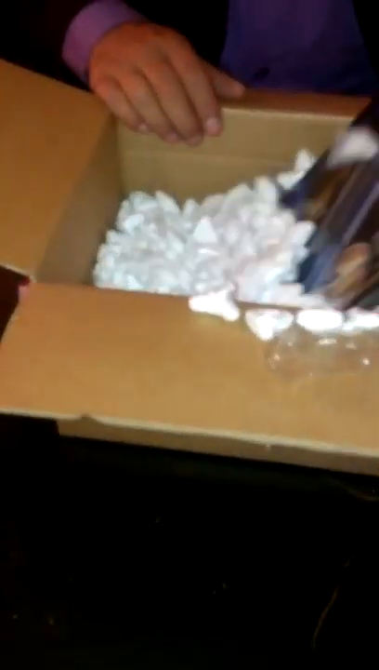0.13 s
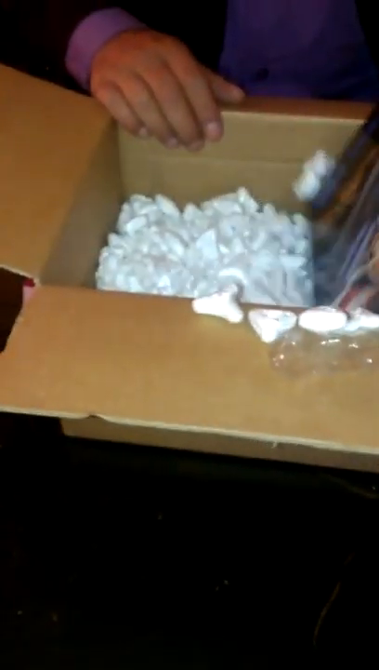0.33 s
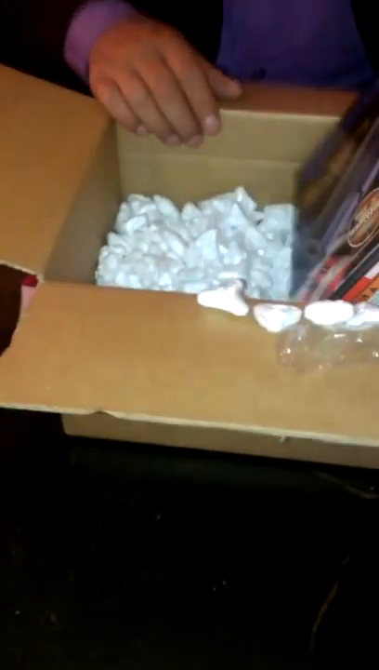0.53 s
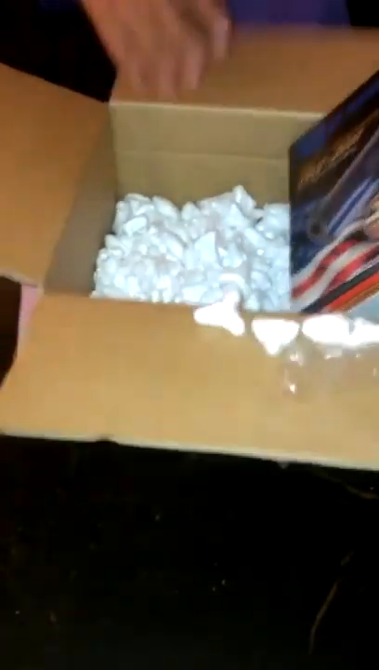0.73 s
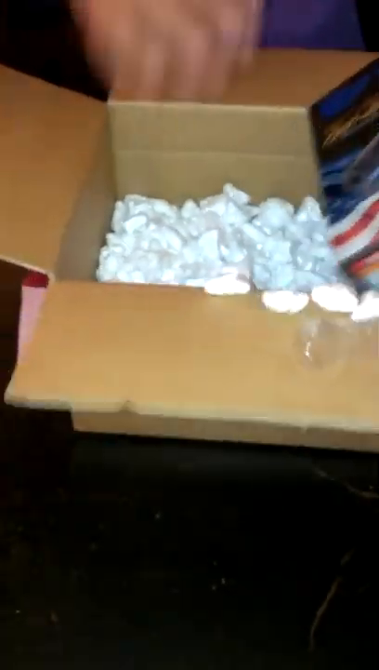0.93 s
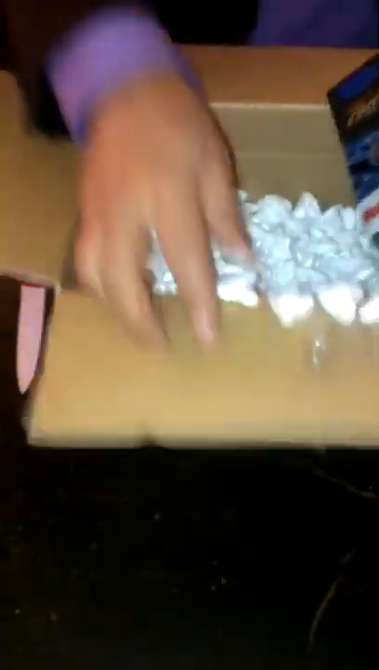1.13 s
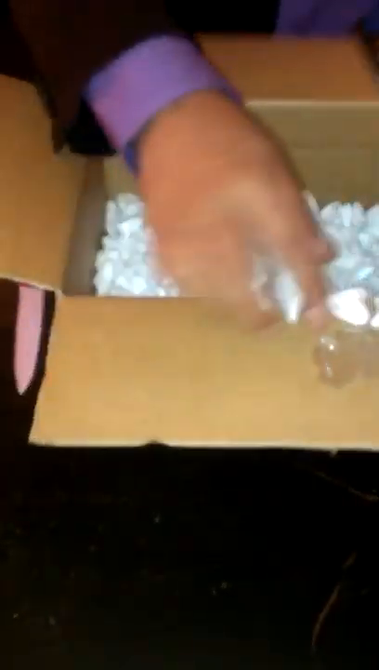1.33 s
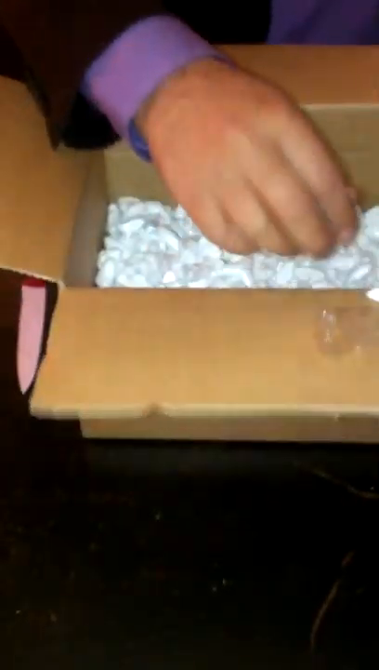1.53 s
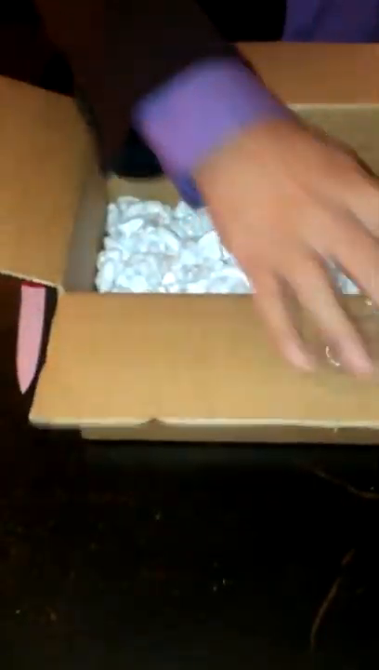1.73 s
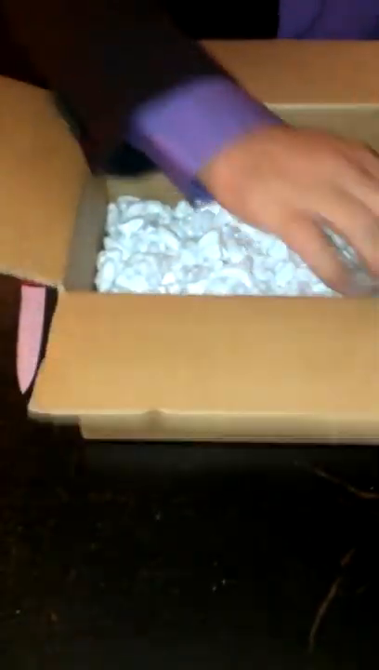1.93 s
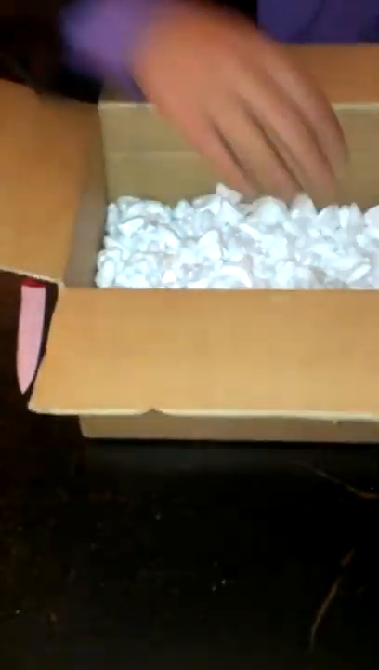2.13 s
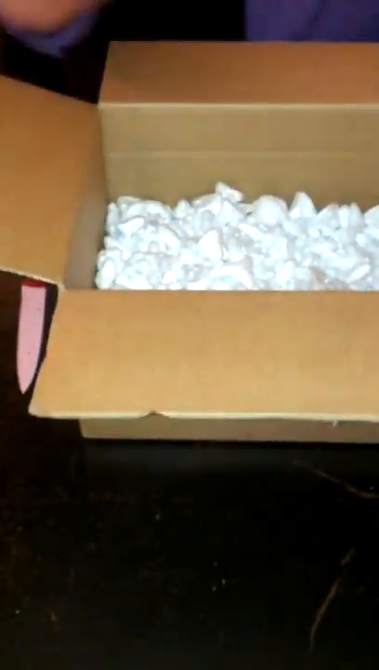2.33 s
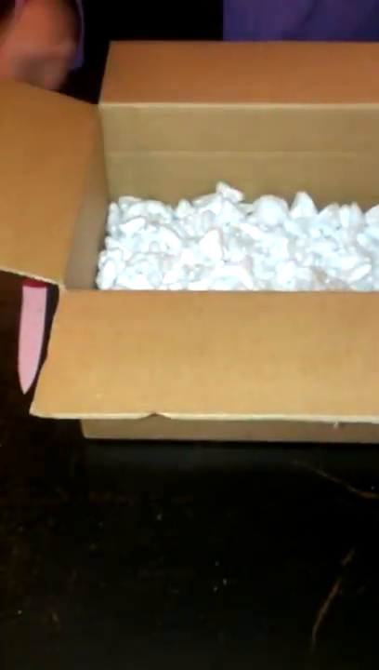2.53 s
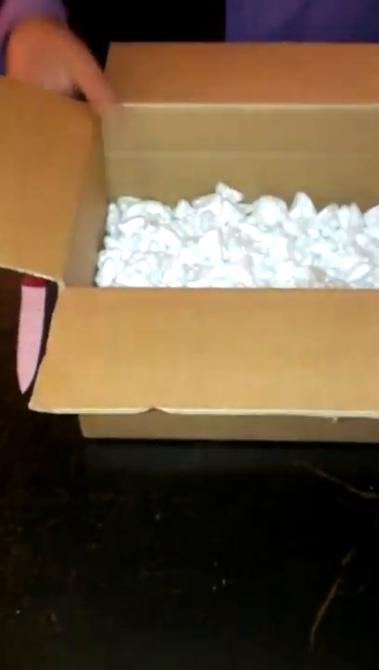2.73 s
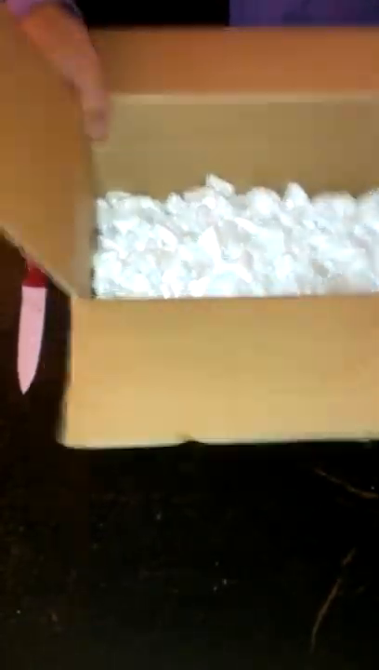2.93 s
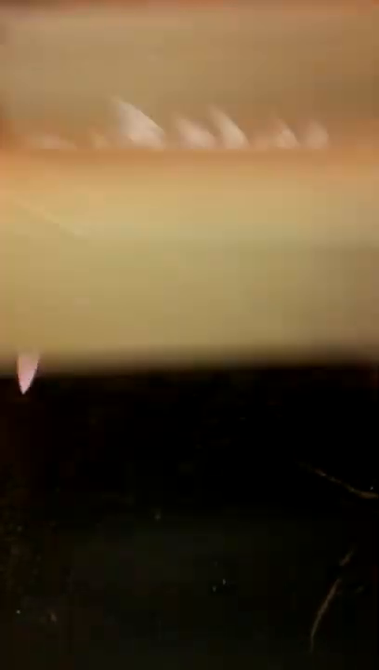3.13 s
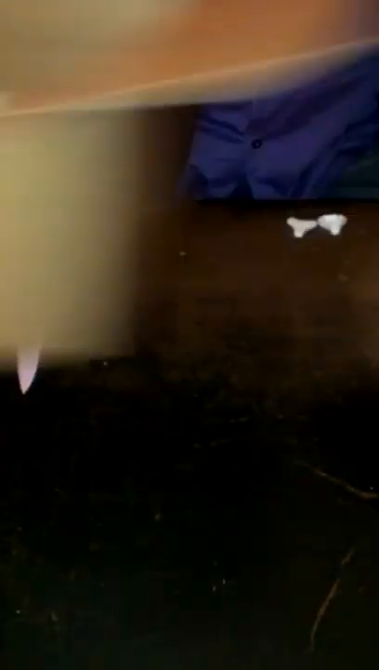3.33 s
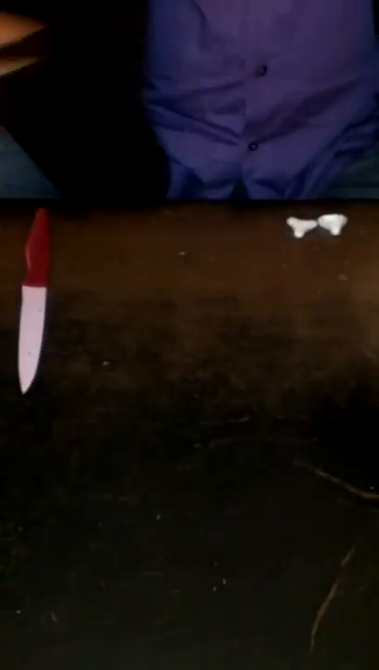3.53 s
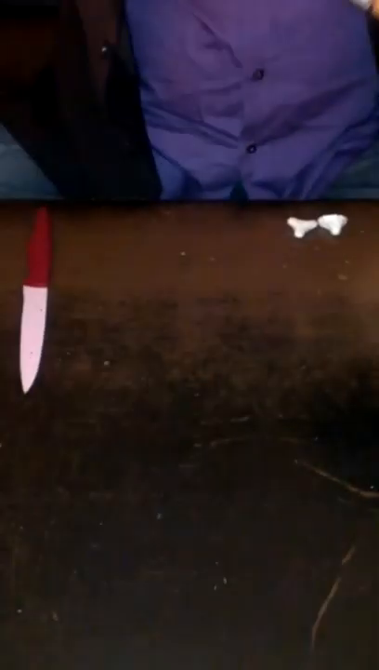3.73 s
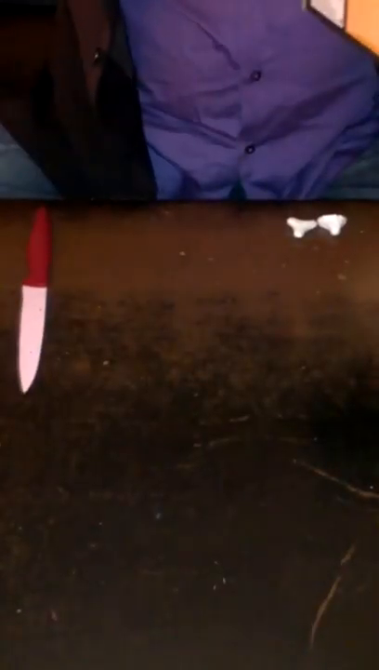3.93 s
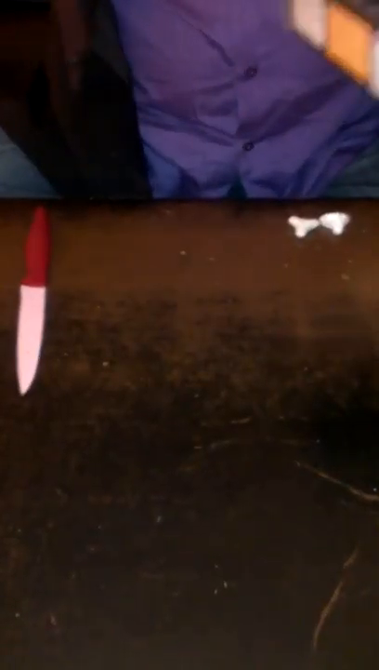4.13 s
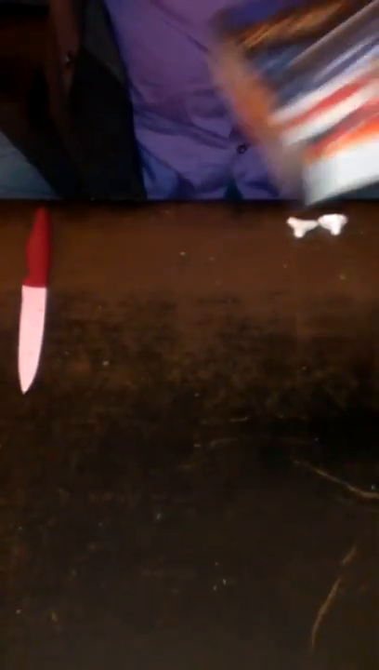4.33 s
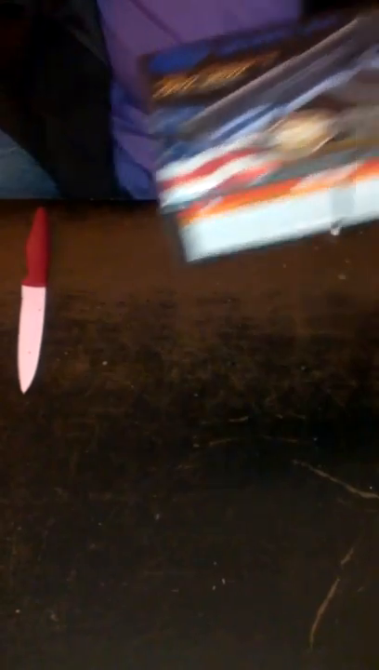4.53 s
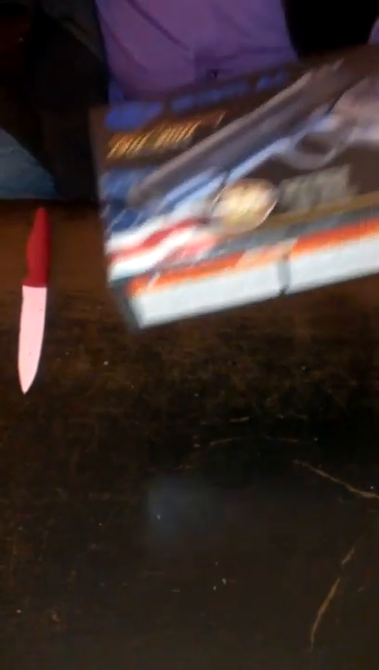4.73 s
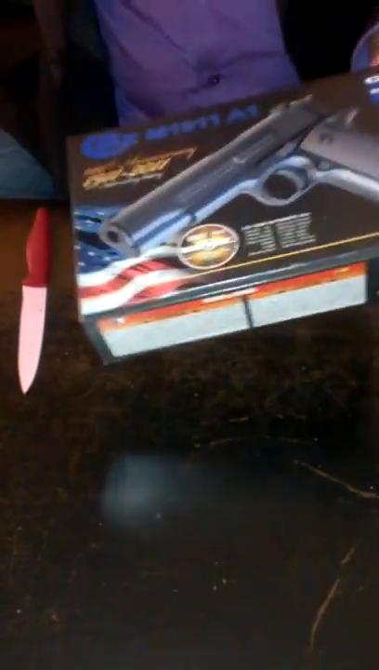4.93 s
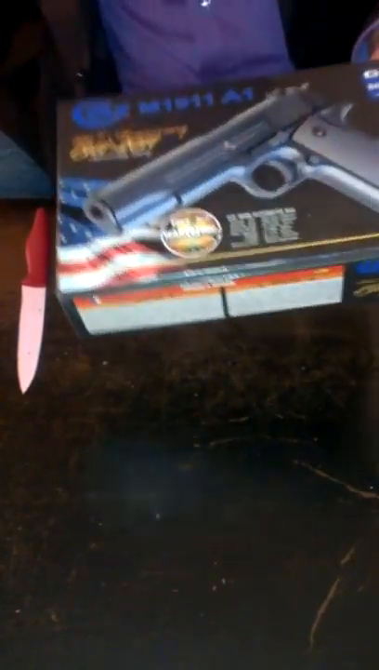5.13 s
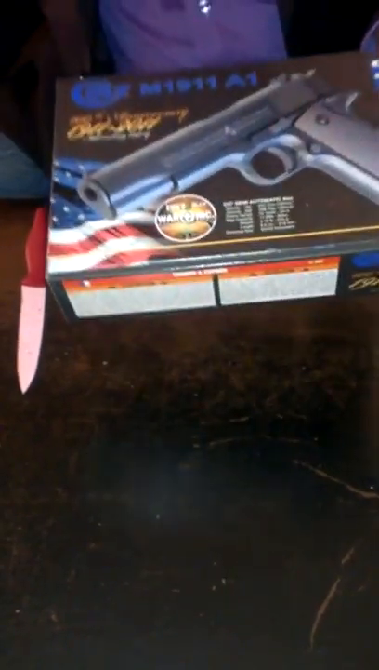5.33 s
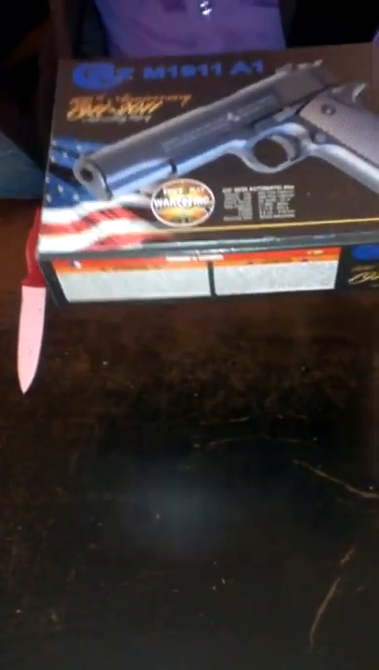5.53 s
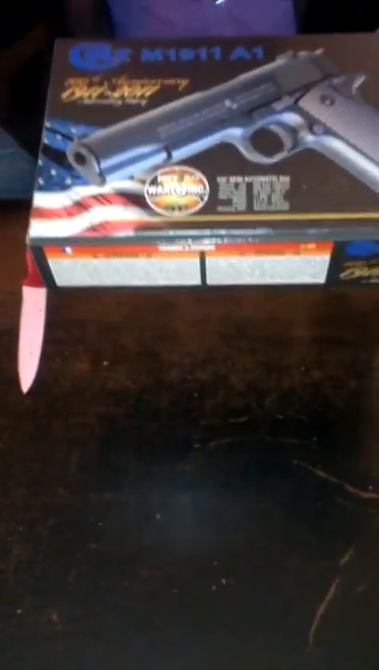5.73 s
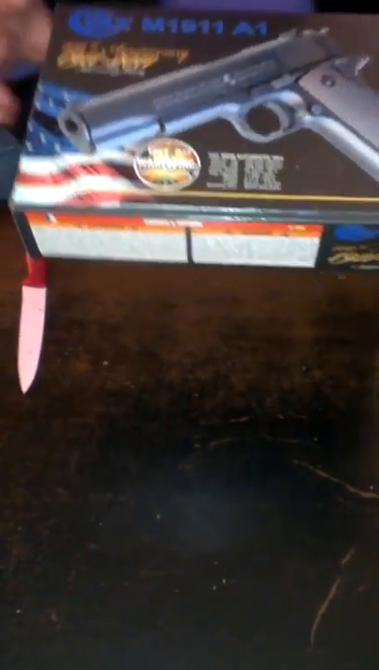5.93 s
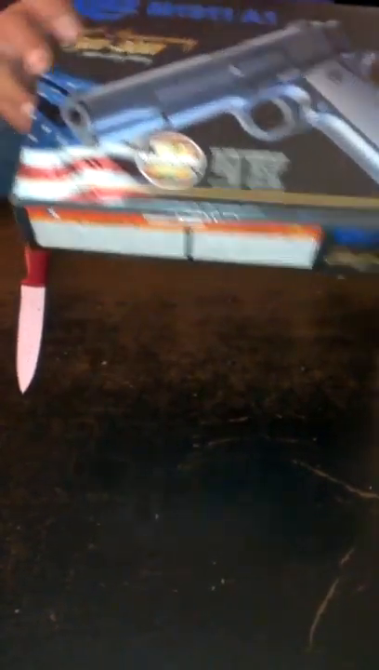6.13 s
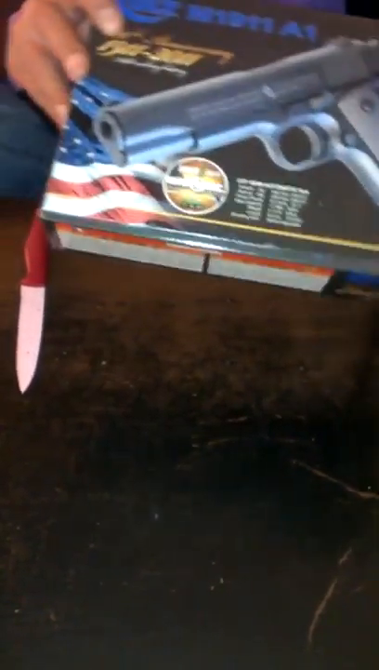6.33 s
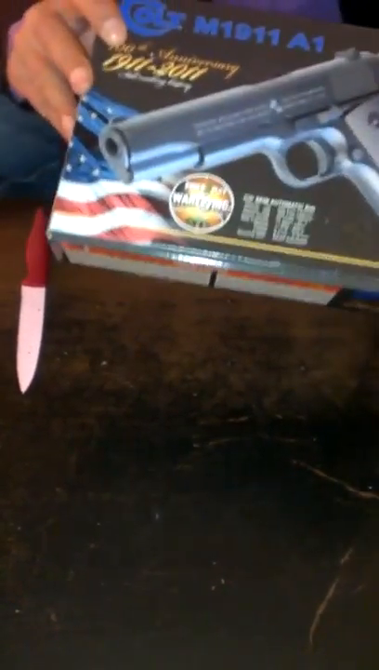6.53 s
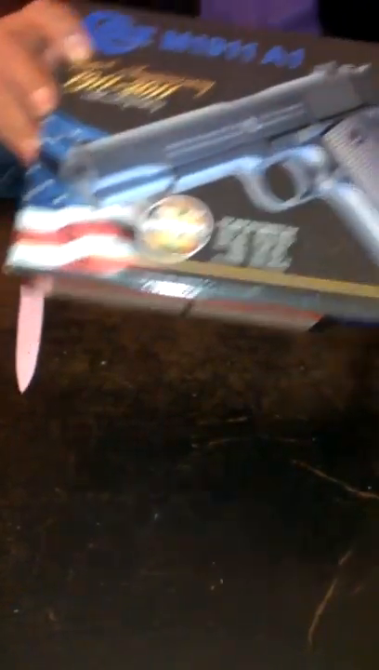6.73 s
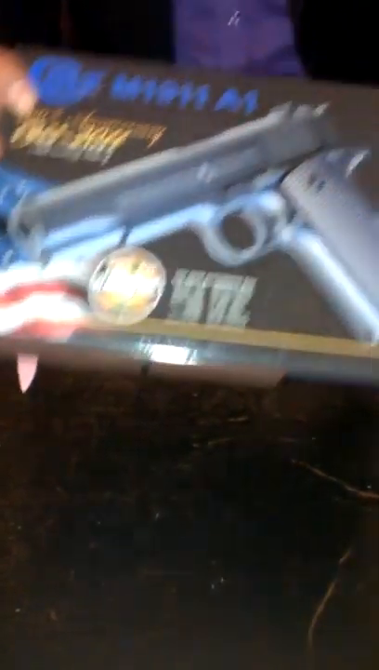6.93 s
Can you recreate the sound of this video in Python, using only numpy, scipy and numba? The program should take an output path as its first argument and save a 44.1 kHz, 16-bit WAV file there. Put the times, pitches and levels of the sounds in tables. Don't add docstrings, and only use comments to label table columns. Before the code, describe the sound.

In a small, softly furnished room, a phone microphone close to the table picks up faint steady hiss and little bass. From 0 to 0.7 s foam peanuts crackle densely and rub against a carton being pulled out, with short ringing scrapes and a hard tap near 0.5. Two hollow cardboard knocks land at 0.8 and 0.93, a faint one at 1.2. Light rubbing around 1.3 to 1.5 leads to a bright crackle and sharp click at 1.85 to 2.0, then near quiet. A small card tap comes at 2.9. The box is shoved with a tight run of loud boomy knocks at 3.25 to 3.4, and again at 3.8 to 4.0 with scraping. Soft handling follows, then carton bumps at 4.95 to 5.3, strongest at 5.2, with a piercing snap at 5.27. It calms; light knocks and rubs return at 6.2 to 6.8, ending in crisp ticks near 6.9.

```python
import sys
import numpy as np
from scipy import signal
from scipy.fft import rfft, irfft
from scipy.io import wavfile
from scipy.ndimage import uniform_filter1d
from numba import njit

SR = 44100
rng = np.random.default_rng(int(sys.argv[2]) if len(sys.argv) > 2 else 0)


def ratio_of_db(decibels):
    return 10 ** (np.asarray(decibels, float) / 20)


def transcribe(signal):
    frames = np.atleast_2d(signal).T
    limited = np.clip(frames, -1, 1)
    pcm = np.round(limited * 32767).astype(np.int16)
    wavfile.write(sys.argv[1], SR, pcm)


N = 308259


def unit(x):
    return x / np.sqrt(np.mean(x ** 2))


def band(x, low_hz, high_hz):
    return signal.sosfilt(signal.butter(2, [low_hz, high_hz], "band", fs=SR, output="sos"), x)


def ring(x, hz, width_hz):
    return signal.lfilter(*signal.iirpeak(hz, hz / width_hz, fs=SR), x)


@njit
def svf(x, hz, q):
    y = np.empty(len(x))
    band_state, low_state, damping = 0., 0., 1 / q
    for i in range(len(x)):
        g = np.tan(np.pi * hz[i] / SR)
        v = (band_state + g * (x[i] - low_state)) / (1 + g * (g + damping))
        band_state = 2 * v - band_state
        low_state += 2 * g * v
        y[i] = damping * v
    return y


def modes_of(force, modes):
    out = 0
    for k, (hz, width_hz, db) in enumerate(modes):
        out = out + (-1) ** k * ratio_of_db(db) * ring(force, hz, width_hz) / np.sqrt(width_hz)
    return out


def body(force, modes, peak_hz, q, peak_db):
    moving = svf(svf(force, peak_hz, q), peak_hz, q) / np.sqrt(peak_hz / q)
    return modes_of(force, modes) + ratio_of_db(peak_db) * moving


def clicks(rate_hz, spread_db):
    hit = rng.random(N) < rate_hz / SR
    sign = rng.standard_normal(N)
    size = np.minimum(rng.exponential(size=N), 4.5)
    return unit(hit * sign * ratio_of_db(spread_db * size))


def flicker(rate_hz):
    hold = max(int(SR / rate_hz), 1)
    return uniform_filter1d(np.repeat(rng.standard_normal(N // 50), hold)[:N], hold)


def strike(level_db, rate_hz, spread_db, uneven_db):
    return clicks(rate_hz, spread_db) * ratio_of_db(level_db + uneven_db * flicker(70))


def moves(table, settle_db, rest_db, rest_trait):
    settle_s = 0.54
    blow_s = .025
    curve, stop = 1.39, 1.88
    start_s, rise_s, fall_s, level_db, trait = np.transpose(table)[:, :, None]
    t = np.arange(0, N, 32) / SR
    rise_s, fall_s = np.maximum(rise_s, .001), np.maximum(fall_s, .01)
    early_s, late_s = np.maximum(start_s - t, 0), np.maximum(t - start_s, 0)
    top = ratio_of_db(2 * (level_db - 20 * (early_s / rise_s) ** curve))
    fall_curve = np.where(rise_s < blow_s, curve, stop)
    move = top * ratio_of_db(-2 * 20 * (late_s / fall_s) ** fall_curve)
    calm = top * ratio_of_db(2 * (settle_db - 20 * late_s / settle_s))
    quiet = calm.sum(axis=0) + ratio_of_db(2 * rest_db)
    total = move.sum(axis=0) + quiet
    mean_trait = ((move * trait).sum(axis=0) + quiet * rest_trait) / total
    return [np.interp(np.arange(N) / SR, t, c) for c in (10 * np.log10(total), mean_trait)]


def swells(table, tone, q):
    out, t = np.zeros(N + SR), np.arange(SR // 5) / SR
    chance = rng.standard_normal((len(table), len(t)))
    for (start_s, swell_s, db, hz), noise in zip(table, chance):
        u = t / max(swell_s, .001)
        clear = np.sin(2 * np.pi * hz * t)
        rough = unit(ring(ring(noise, hz, hz / q), hz, hz / q))
        out[int(start_s * SR):][:len(t)] += ratio_of_db(db) * u * np.exp(1 - u) * (tone * clear + (1 - tone) * rough)
    return out[:N]


def snaps(table, cycles, tail_share, tail_t60_s):
    out, t = np.zeros(N + SR), np.arange(SR // 10) / SR
    chance = rng.standard_normal((len(table), len(t)))
    for (start_s, db, hz), noise in zip(table, chance):
        snap = np.sin(2 * np.pi * hz * t) * np.exp(-t * hz / cycles) * (1 - np.exp(-t * hz / 0.66))
        tail = unit(ring(ring(noise, hz, 1.9 * hz), hz, 1.9 * hz)) * ratio_of_db(-60 * t / tail_t60_s)
        out[int(start_s * SR):][:len(t)] += ratio_of_db(db) * (snap + tail_share * tail)
    return band(out[:N], 710, 8700)


def strokes():
    # start_s, rise_s per 20 dB, fall_s per 20 dB, level_db, strongest ring_hz
    foam_rubs = [(0.0, .1, 0.09, -32, 1960), (.17, 8, 0.14, -39, 1200), (.33, 3.1, 0, -52, 1430),
                 (.475, 0.11, 0.06, -32, 1970), (.525, 0, -1.5, -26, 1980), (.58, 1, 0.38, -51.5, 990),
                 (.805, .003, .1, -41, 990), (.934, .003, .09, -46, 950), (1.195, -0.1, 0.15, -49.5, 1570),
                 (1.33, 0.04, 0.0048, -40.5, 1730), (1.4, 0.3, -0.07, -61, 1800),
                 (1.48, 0.45, -0.04, -49.5, 1800), (1.97, 0.13, -0.12, -42, 2130),
                 (2.12, 0.4, -0.35, -59, 1730), (2.26, 0.5, -0.53, -55.5, 1640)]
    card_rubs = [(2.873, 0.0081, .09, -40, 1035), (2.82, .03, 0.16, -57, 1800),
                 (3.0, 0.23, 0.38, -57.5, 970), (3.238, 0.0027, 0.15, -32.5, 1080),
                 (3.309, 0.063, 0.13, -30.5, 1317), (3.52, 0.15, 0.13, -56, 965),
                 (3.788, 0.0022, 0.15, -30.5, 1120), (3.89, .14, .05, -37, 1400),
                 (3.97, 0.039, 0.12, -41, 1305), (4.195, 0.061, 0.12, -41.5, 1820),
                 (4.66, 0.31, 0.22, -52, 1216), (4.966, 0.0055, 0.12, -37.5, 1190),
                 (4.932, 0.068, 0.076, -51, 1130), (5.09, 0.032, 0.081, -41, 1086),
                 (5.19, 0.0025, 0.16, -32.5, 1140), (5.299, 0.14, 0.044, -38, 1250),
                 (6.18, 0.14, 0.19, -50, 1800), (6.288, 0.0028, 0.12, -49.5, 1070),
                 (6.5, 0.023, 0.15, -36, 1770), (6.72, 0.34, 0.065, -58.5, 1140),
                 (6.798, 0.013, 0.11, -41.5, 2260), (6.94, 0.06, 0.032, -38, 770)]
    return moves(foam_rubs + card_rubs, settle_db=-28.0, rest_db=-75.0, rest_trait=1170)


def grains(spectrum, level_db, rate_hz, q, patch_db):
    hz, db = np.transpose(spectrum)
    out, power, shared = 0, 0, flicker(90)
    for f in np.geomspace(hz[0], hz[-1], num=6):
        weight = ratio_of_db(np.interp(np.log(f), np.log(hz), db))
        force = strike(level_db + 1.48 * shared + patch_db * flicker(14), rate_hz, 1.76, 0.33)
        out = out + weight * ring(ring(force, f, f / q), f, f / q)
        power += weight ** 2 * f / q / SR
    return out / np.sqrt(power)


def crackle():
    # start_s, rise_s per 20 dB, fall_s per 20 dB, level_db, sheen_db above it
    foam_bursts = [(0.0, .1, 0.04, -34, -10), (.12, 1, 0.22, -41, -6), (.2, 0.2, 0.12, -44.5, 1.5),
                   (.32, .08, 0.0145, -37, -0.5), (.431, .003, .3, -46, -6), (.475, 0, 0, -30, -9),
                   (.53, -0.5, 0.09, -43.5, -22), (.6, 0.27, 0.02, -47, 10), (.806, -0.5, 0.15, -47, -5),
                   (.934, -0.7, 0.15, -54.5, -5), (1.195, .003, .3, -54, -4),
                   (1.32, 0.1, 0.24, -50.5, -3.5), (1.48, 0.06, 0, -39, -5), (1.65, -1.04, -1, -62, -1),
                   (1.864, -0.04, -0.01, -30.5, -7), (1.97, 0.0961, 0.03, -30, -8.5),
                   (2.13, 0.2, 0, -53.5, -5), (2.24, 0.5, 0.05, -55.5, -3.5), (2.36, 0, -0.52, -62.5, 4)]
    card_bursts = [(2.81, .005, 0.22, -58, -12.5), (2.877, 0.038, 0.088, -45.5, -5),
                   (3.0, 0.18, 0.64, -56, -3.5), (3.237, 0.0019, 0.13, -34.5, -15.5),
                   (3.33, 0.068, 0.091, -37, -10), (3.788, 0.0021, 0.11, -40.5, -7.5),
                   (3.891, 0.055, 0.035, -38, -5.5), (3.968, 0.051, 0.062, -43, -5),
                   (4.08, 0.12, 0.11, -55, -1.5), (4.498, 0.16, 0.63, -60.5, -2),
                   (4.189, 0.064, 0.19, -51.5, -5), (4.631, 0.041, 0.21, -49.5, -4),
                   (4.87, 0.21, 0.4, -58.5, -2), (4.96, 0.019, 0.15, -42.5, -3.5),
                   (5.076, 0.0033, 0.1, -37.5, -7), (5.19, 0.011, 0.25, -39, -7),
                   (5.269, 0.0086, 0.075, -28, -9), (5.304, 0.077, 0.053, -32.5, -14),
                   (5.56, 0.025, .06, -62.5, -3), (5.88, 0.16, 0.072, -65, -8),
                   (6.14, 0.13, 0.2, -54, -2.5), (6.44, .004, .35, -50, -6),
                   (6.498, 0.0051, 0.098, -39, -11.5), (6.69, 0.089, 0.18, -56, -3.5),
                   (6.799, 0.0069, 0.17, -46, -13.5), (6.928, 0.017, 0.051, -27.5, -0.5)]
    # pitch_hz, density_db per Hz
    large_spectrum = [(2800, 0), (3400, -0.5), (4200, -1.5)]
    foam_spectrum = [(4400, -2), (5000, 2), (5900, 1.5), (6800, -6.5)]
    film_spectrum = [(7200, 1), (8300, 0.5), (9500, -12.5), (11000, -9), (13000, -14), (15500, -17)]
    level_db, sheen_db = moves(foam_bursts + card_bursts, settle_db=-28.5, rest_db=-75.0, rest_trait=-1.4)
    stroke_db = strokes()[0]
    large_db = level_db + 0.21 * (stroke_db - level_db)
    large = ratio_of_db(-13) * grains(large_spectrum, large_db, 800, 4.1, 0.69)
    foam = ratio_of_db(-10) * grains(foam_spectrum, level_db, 1000, 6.0, 2.1)
    film = ratio_of_db(-7.5) * grains(film_spectrum, level_db + sheen_db, 2000, 3.35, 2.1)
    return large + foam + film


def rub():
    # mode_hz, width_hz, level_db
    face_modes = [(694, 210, -5.5), (951, 210, -0.5), (1080, 115, -0.5), (1455, 170, -2), (1500, 41, -2),
                  (1800, 460, -2), (2130, 55, -4.5), (2550, 1200, 0)]
    # (mode_hz, width_hz, level_db)
    dragged = [
        (0.428, 0.682, [(1800, 32, -2), (2550, 61, -11), (3500, 59, -7), (4180, 43, -9), (4680, 24, -11), (5970, 130, -4)]),
        (1.27, 1.52, [(651, 18, -3), (1315, 54, -9), (1756, 59, 5), (2970, 160, -7.5), (3920, 65, -5), (5300, 130, -24)]),
    ]
    level_db, peak_hz = strokes()
    force, t = strike(level_db, 1800, 1.5, 0.22), np.arange(N) / SR
    held = [uniform_filter1d(1. * ((t > a) & (t < b)), size=600) for a, b, _ in dragged]
    free = force * (1 - 0.42 * sum(held))
    faces = band(body(free, face_modes, peak_hz, 4.2, 4.15), 610, 2550)
    peanut = 0
    for hold, (_, _, modes) in zip(held, dragged):
        damped = [(hz, 1.2 * width_hz, db) for hz, width_hz, db in modes]
        peanut = peanut + modes_of(force * hold, damped)
    return ratio_of_db(28.5) * faces + ratio_of_db(32.0) * band(peanut, 510, 6500)


def scuffs():
    # start_s, swell_s, peak_db, pitch_hz
    scuff_events = [(.0, 0.0012, -29, 2400), (.007, 0.0016, -37, 1800), (.022, 0.0015, -37, 2620),
                    (.06, 0.004, -41, 2580), (.076, 0.0023, -39, 2620), (.128, 0.0044, -37.5, 5660),
                    (.14, 0.0059, -46, 1500), (.166, 0.002, -37, 4800), (.189, .004, -37, 5500),
                    (.21, 0.0031, -34, 5800), (.283, 0.0019, -42, 5000), (.294, 0.0038, -39, 5200),
                    (.316, 0.011, -36, 5940), (.342, 0.0029, -41, 1400), (.45, 0.0036, -46, 1920),
                    (.463, 0.0036, -43, 1920), (.464, 0.0046, -37, 3900), (.479, 0.0035, -38, 2010),
                    (.505, 0.002, -45, 7460), (.517, 0.0036, -32.5, 2550), (.539, 0.0021, -34, 1740),
                    (1.322, 0.01, -42.5, 1730), (1.472, 0.0053, -41, 3210), (1.634, 0.0023, -59, 7460),
                    (1.655, 0.0085, -53.5, 6530), (1.842, 0.0033, -46.5, 7100), (1.865, 0.0034, -40, 8050),
                    (1.95, 0.017, -43, 1954), (2.103, 0.0027, -47, 6460), (3.267, 0.0023, -36, 2170),
                    (3.323, 0.0028, -30.5, 1910), (4.966, 0.0027, -40, 1170), (5.078, 0.0025, -47, 5550),
                    (5.277, 0.0021, -23, 5400), (5.57, 0.0066, -60.5, 2020), (6.288, 0.002, -46, 1110),
                    (6.503, 0.0022, -36, 1500), (6.51, 0.01, -41, 3000), (6.8, 0.0028, -36.5, 2940)]
    return swells(scuff_events, tone=0.36, q=2.2)


def walls():
    # start_s, rise_s per 20 dB, fall_s per 20 dB, level_db, strongest wall resonance_hz
    shoves = [(0.0, -2.2, 0.5, -47.5, 440), (.15, 0.2, 0.13, -41.5, 525), (.27, 0, 0.4, -56, 685),
              (.51, 0.2, 0.04, -49.5, 610), (.805, .003, .085, -30, 520), (.934, .003, .07, -37, 400),
              (1.195, .003, .14, -47, 520), (1.43, 0.43, 0.11, -53.5, 624), (1.98, 0.06, 0, -48.5, 512),
              (2.875, -0.16, 0.27, -46, 506), (3.17, -0.01, 0, -49, 440), (3.237, 0.0132, 0.1, -26.5, 437),
              (3.33, 0.0869, 0.0839, -29, 437), (3.385, .05, .03, -36, 500), (3.788, .003, .16, -29, 450),
              (3.89, .12, .05, -38, 430), (3.55, 0.27, -0.1, -50.5, 480), (3.97, -0.34, 0.18, -42, 480),
              (4.2, 0, 0.16, -50.5, 480), (4.49, 0.1, 0.55, -55, 513), (4.69, 0.05, 0.15, -57, 512),
              (4.963, 0.06, 0.43, -44.5, 516), (5.077, 0.04, 0.28, -44, 510), (5.189, .003, .15, -26, 500),
              (5.86, -0.1, -0.6, -59, 450), (6.14, 0.5, .1, -73, 453), (6.2, 0.19, 0.05, -45, 470),
              (6.62, 0.3, 1, -65, 480), (6.5, 0.2, 0.5, -51, 460), (6.92, -0.11, 0, -38.5, 404)]
    # start_s, fall_s per 20 dB, level_db
    thuds = [(0.0, 0.52, -54.5), (0.511, -0.17, -51.5), (0.804, 0.0429, -25), (0.932, -0.0236, -36.5),
             (1.194, 0.17, -52.5), (2.082, 0, -56), (2.874, 0.24, -54), (3.0, 0.55, -63.5),
             (3.237, 0.19, -43.5), (3.36, 0, -35), (3.787, 0.13, -27), (3.947, 0.1, -35.5),
             (4.2, 0.16, -56), (4.47, 0.43, -58), (4.852, 1.05, -60.5), (4.961, 0.14, -39),
             (5.077, 0.08, -45), (5.19, 0.1347, -29.5), (6.12, 0.5, -65), (6.5, 0.5, -66),
             (6.7, 0.1, -57.5), (6.901, 0, -55)]
    # mode_hz, width_hz, level_db
    wall_modes = [(274.4, 46, -13), (383, 82, -5.5), (417, 31, -0.5), (443, 34, -3.5), (480, 96, -3.5),
                  (516, 125, -1), (631, 42, -5), (735, 28.4, -17.5)]
    deep_modes = [(117.7, 11, -32), (148.5, 38, -1), (192, 27, -2.5), (249, 48, -1)]
    thud_rise_s = 0.011
    level_db, peak_hz = moves(shoves, settle_db=-27.0, rest_db=-78, rest_trait=476)
    heavy = [(start_s, thud_rise_s, fall_s, db, 0) for start_s, fall_s, db in thuds]
    deep_db = moves(heavy, settle_db=-35, rest_db=-83.5, rest_trait=0)[0]
    skin = body(strike(level_db, 1500, 1.5, 1.2), wall_modes, peak_hz, 4.0, 5.3)
    deep = modes_of(strike(deep_db, 400, 0.91, 0.56), deep_modes)
    return ratio_of_db(33) * band(skin, 226, 890) + ratio_of_db(33.0) * band(band(deep, 105, 320), 89, 400)


def hiss():
    # freq_hz, density_db per Hz
    spectrum = [(18, -51), (30, -13), (145, -11.5), (398, -3), (443, -0.5), (548, -9.5), (696, 1.5),
                (984, -11), (1100, -16.5), (1920, -8.5), (6190, -14.5), (16200, -16), (17500, -19)]
    level_db = -69.5
    hz, db = np.transpose(spectrum)
    f = np.arange(N // 2 + 1) * SR / N + 1
    shape = ratio_of_db(np.interp(np.log(f), np.log(hz), db))
    return ratio_of_db(level_db) * unit(irfft(rfft(rng.standard_normal(N)) * shape, N))


def slips():
    # start_s, swell_s, peak_db, pitch_hz
    slip_events = [(.109, 0.0021, -36.5, 610), (.14, 0.0011, -29.5, 1030), (.195, 0.0015, -37, 556),
                   (.245, 0.0018, -29.5, 720), (.296, 0.0011, -33, 920), (.31, 0.0037, -37.5, 690),
                   (.794, 0.0043, -52, 460), (.805, 0.003, -27, 948), (.806, 0.0026, -31, 550),
                   (.826, 0.0072, -27.5, 544), (.836, 0.0055, -35, 252), (.858, 0.0043, -38, 298),
                   (.935, 0.0017, -27, 1000), (.958, 0.0066, -38, 244), (3.365, 0.0026, -32, 503),
                   (3.372, 0.0076, -30.5, 785), (3.397, 0.0034, -28, 506), (3.79, 0.0035, -19.5, 224),
                   (3.858, 0.0039, -27, 457), (3.87, 0.0061, -26.5, 393), (3.96, 0.0059, -38.5, 1140),
                   (3.99, 0.0029, -33, 213), (4.997, 0.009, -34, 492), (5.222, 0.0047, -28, 406),
                   (5.243, 0.0054, -29, 480), (5.258, 0.004, -33, 523), (5.298, 0.008, -33, 521),
                   (6.12, 0.0021, -51, 320), (6.388, 0.0017, -53, 1000), (6.439, 0.0012, -45, 396),
                   (6.683, 0.004, -44, 460), (6.724, 0.004, -48, 308), (6.29, 0.0036, -46, 297),
                   (6.722, 0.0018, -51, 1050), (6.94, 0.012, -43, 892)]
    return swells(slip_events, tone=0.68, q=5.5)


def ticks():
    # start_s, peak_db, pitch_hz
    film_ticks = [(0.829, -27.5, 5100), (1.2027, -36, 3840), (1.6114, -44.5, 7100), (1.6521, -38, 6540),
                  (1.6765, -43.5, 3940), (1.8257, -32, 5200), (1.8637, -30, 5170), (1.9532, -18.5, 4600),
                  (2.0577, -41, 5360), (2.0924, -36, 5820), (2.287, -43, 7500), (2.3486, -39, 6300),
                  (2.575, -47.5, 7350), (3.8888, -27, 6000), (4.1114, -56, 5410), (4.4179, -43, 6830),
                  (4.725, -57, 7000), (4.833, -44, 7500), (5.0784, -32, 4860), (5.2704, -15.5, 5600),
                  (5.485, -57, 8000), (5.6466, -45, 7340), (5.665, -47, 7000), (6.4178, -36, 6540),
                  (6.4403, -23.5, 6340), (6.687, -36, 6500), (6.755, -46, 7440), (6.876, -40, 8000),
                  (6.907, -29, 7850), (6.9132, -21, 8140), (6.9197, -16.5, 7400), (6.987, -34, 7000)]
    # start_s, peak_db, pitch_hz
    taps = [
        (0.4314, -25, 2480),
        (0.5157, -20.5, 1800),
        (0.6466, -32.5, 1800),
        (1.4728, -41, 1800),
        (2.8759, -30.5, 2480),
        (3.2909, -19.5, 1500),
        (4.1919, -30, 1580),
    ]
    film = snaps(film_ticks, 2.2, .15, .025)
    return ratio_of_db(2.0) * film + ratio_of_db(-5.5) * snaps(taps, 4.4, 0.38, 0.07)


def strays():
    # start_s, peak_db, pitch_hz
    stray_ticks = [
        (.735, -45, 7000),
        (1.005, -44, 7500),
    ]
    return snaps(stray_ticks, 2.3, .3, .02)


def knocks():
    # start_s, peak_db, pitch_hz, hard edge_db above the peak
    blows = [(0.804, -18.5, 342, -6.5), (0.815, -24, 245, -32), (0.933, -23, 258, -4.5),
             (1.193, -34, 500, -28), (3.235, -16.5, 434, -46), (3.265, -14.5, 471, -3),
             (3.289, -14, 437, -2), (3.321, -13.5, 439, -17), (3.347, -14.5, 480, -10),
             (3.789, -17.5, 459, -12), (3.814, -17, 435, -24), (3.836, -23.5, 474, -7.5),
             (3.947, -20, 201, -19), (4.191, -39, 400, -3), (4.404, -50, 299.6, -22.5),
             (4.473, -40.5, 158, -28), (4.517, -44, 152, -25), (4.761, -54.5, 303, -19),
             (4.965, -27.5, 499, -3.5), (5.075, -34.5, 538, 1.5), (5.186, -17.5, 320, -17),
             (5.21, -23, 506, -6), (5.665, -49, 328, -13), (5.833, -45, 290, -6), (6.004, -53, 466, 2.5),
             (6.188, -38, 430, -6), (6.288, -45.5, 370, 6), (6.504, -32.5, 294, 0), (6.796, -46.5, 485, 4),
             (6.892, -37, 311, -17), (6.925, -29.5, 400, -6.5)]
    out, t = np.zeros(N + SR), np.arange(SR // 4) / SR
    chance = rng.standard_normal((len(blows), 2, len(t)))
    rise = 1 - np.exp(-t / 0.0029)
    for (start_s, db, hz, edge_db), (shake, scrape) in zip(blows, chance):
        panel = np.sin(2 * np.pi * hz * t) * ratio_of_db(-60 * t / 0.073)
        neighbours = 0.39 * unit(band(shake, 0.71 * hz, 1.22 * hz)) * ratio_of_db(-60 * t / 0.095)
        clack = unit(band(scrape, 490, 1470)) * ratio_of_db(edge_db - 3.0 - 60 * t / 0.064)
        out[int(start_s * SR):][:len(t)] += ratio_of_db(db - 3.0) * rise * (panel + neighbours + clack)
    return band(out[:N], 97, 9000)


def squeaks():
    # start_s, swell_s, peak_db, pitch_hz
    squeak_events = [(3.255, 0.0069, -29, 428), (3.30, .01, -27, 400), (3.815, .012, -27.5, 451),
                     (3.89, 0.0089, -42, 1057), (4.47, 0.011, -54, 650), (4.66, 0.009, -52, 430),
                     (4.69, 0.014, -56, 520), (4.9, .012, -54.5, 1250), (4.96, .012, -48, 5400),
                     (5.08, 0.015, -39.5, 4930), (5.2, .02, -33, 480), (6.11, 0.027, -58, 1893),
                     (6.18, 0.012, -55, 2700), (6.2, .02, -49, 468)]
    return swells(squeak_events, tone=0.59, q=12)


def room(x):
    t60_s, level_db = 0.31, -10.5
    t = np.arange(SR // 2) / SR
    noise = rng.standard_normal(len(t))
    dull = signal.lfilter([.25], [1, -.75], noise)
    bright = 1.48 * (noise - dull)
    tail = dull * ratio_of_db(-60 * t / t60_s) + bright * ratio_of_db(-60 * t / (0.7 * t60_s))
    tail *= t > .004
    return x + ratio_of_db(level_db) * signal.fftconvolve(x, tail / np.sqrt(np.sum(tail ** 2)))[:N]


def scene():
    in_room = crackle() + rub() + scuffs() + walls() + slips() + ticks() + knocks()
    return (room(in_room) + hiss() + strays() + squeaks())[None]


def roll_off(x):
    return signal.sosfilt(signal.butter(12, 18420, fs=SR, output="sos"), x)


def record(dry):
    skew = .12
    cut = signal.sosfilt(signal.butter(2, 110, "high", fs=SR, output="sos"), dry)
    cut = signal.sosfilt(signal.ellip(8, .2, 60, 17300, fs=SR, output="sos"), cut)
    rounded = np.tanh(1.814 * (cut + skew * cut ** 2)) / 1.242
    return roll_off(rounded)


dry = scene()
out = record(dry)
transcribe(out)
```